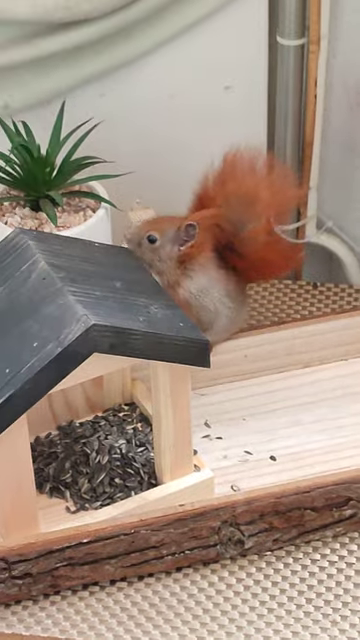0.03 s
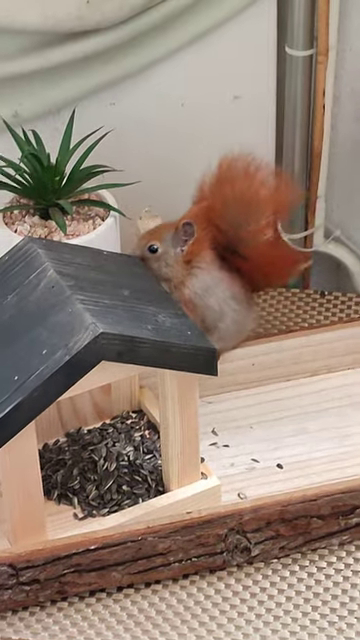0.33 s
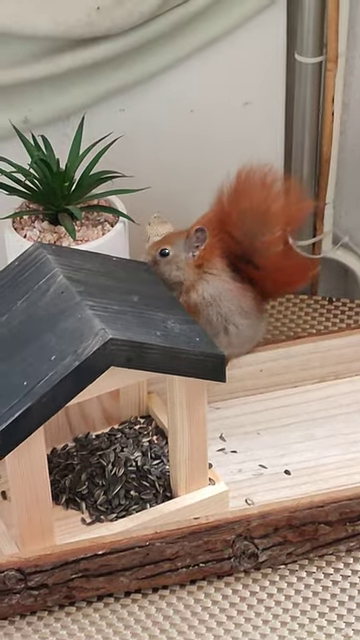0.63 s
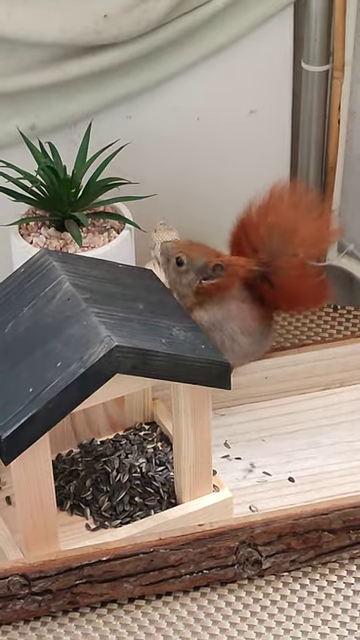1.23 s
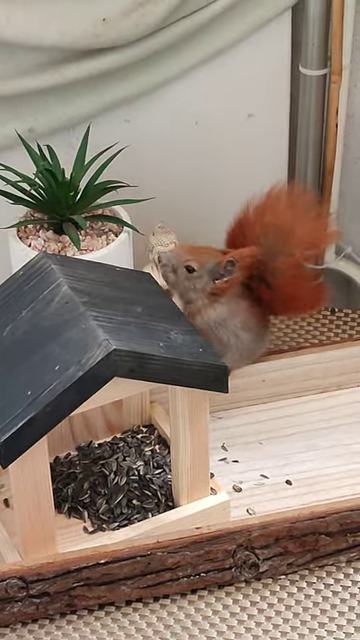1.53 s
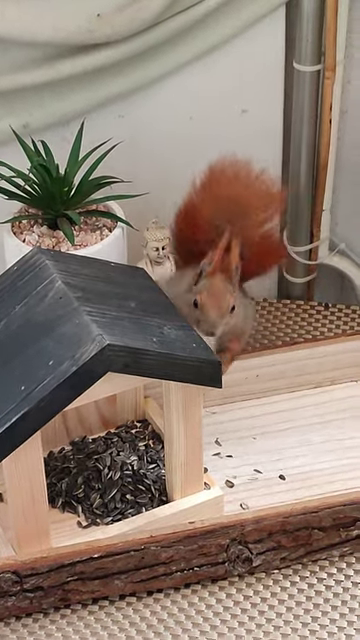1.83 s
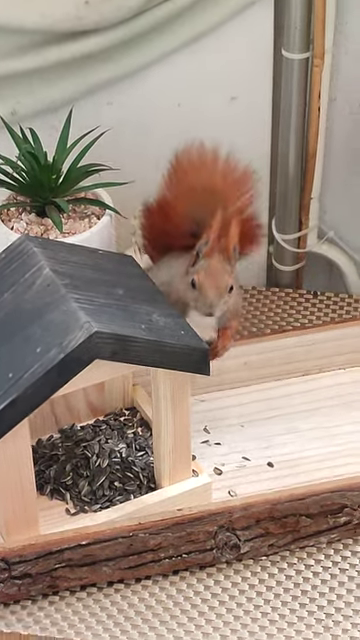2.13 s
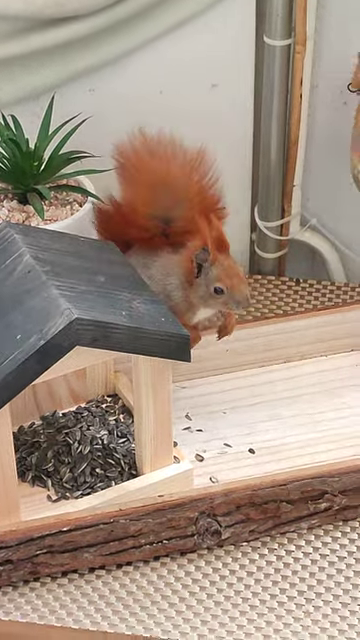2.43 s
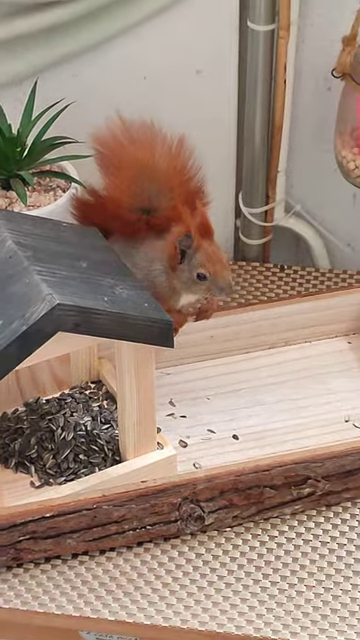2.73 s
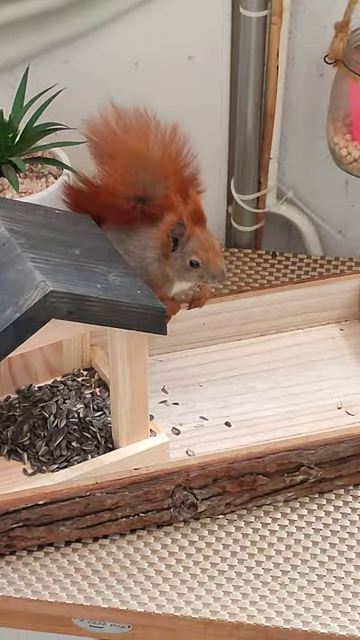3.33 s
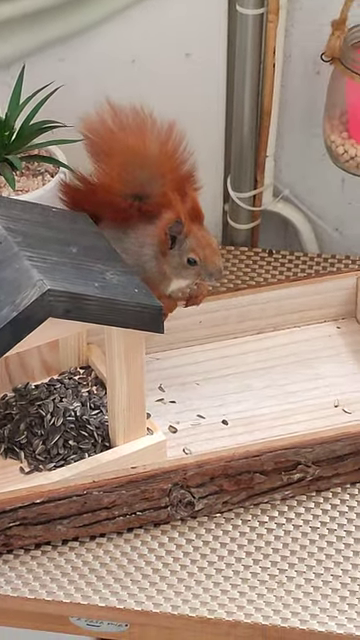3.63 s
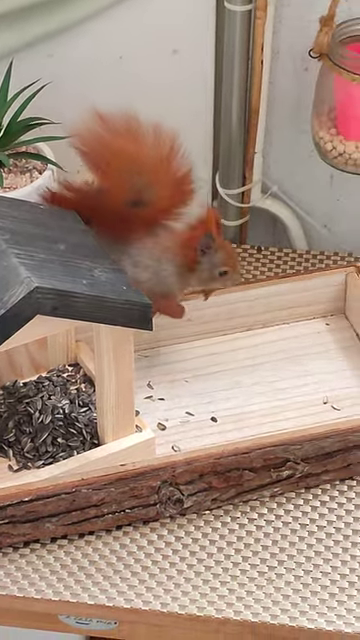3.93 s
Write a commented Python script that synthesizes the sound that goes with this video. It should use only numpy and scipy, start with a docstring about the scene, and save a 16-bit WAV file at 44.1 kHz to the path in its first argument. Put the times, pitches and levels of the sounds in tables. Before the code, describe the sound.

Sharp little clicks of a squirrel cracking seeds, with gusts rumbling on the microphone.

```python
"""Squirrel at a balcony feeder

A squirrel shuffles on a wooden feeder and cracks seed shells: tiny fractures ring each husk,
and the balcony walls throw the snap back. Light gusts buffet the microphones, mostly the left.
Far off, a bird whistles and something wooden knocks over a quiet outdoor hush."""
import sys
import numpy as np
from scipy import signal
from scipy.fft import rfft, irfft
from scipy.io import wavfile
from scipy.ndimage import uniform_filter1d

SR = 44100
rng = np.random.default_rng(int(sys.argv[2]) if len(sys.argv) > 2 else 0)


def transcribe(u):
    """Save the signal u as a 16-bit wav file named by the first command-line argument.

    u: samples, shape (n,) or (channels, n), limited to [-1, 1]; the rate is SR.
    q: integer samples, one column per channel.
    """
    v = np.clip(np.atleast_2d(u).T, -1, 1)
    q = np.round(v * 32767).astype(np.int16)
    wavfile.write(sys.argv[1], SR, q)


N = 176400


def amp(db):
    return 10 ** (np.asarray(db) / 20)


def unit_rms(x):
    return x / np.sqrt(np.mean(x ** 2) + 1e-30)


def curve_at(points, hz):
    """Reads a curve on a log-frequency axis."""
    f, value = np.transpose(points)
    return np.interp(np.log(hz + 1), np.log(f), value)


def add(mix, start_s, sound):
    part = mix[..., max(round(start_s * SR), 0):][..., :sound.shape[-1]]
    part += sound[..., :part.shape[-1]]


def freqs(size):
    return np.fft.rfftfreq(size, 1 / SR) + 1


def pan(left_over_right_db):
    return amp(np.array([[left_over_right_db], [-left_over_right_db]]) / 2)


def click_from(spectrum_db):
    """The tightest causal click with this spectrum."""
    log_gain = np.log(amp(np.r_[spectrum_db, spectrum_db[-2:0:-1]]))
    return np.fft.ifft(np.exp(signal.hilbert(log_gain).conj())).real[:len(spectrum_db)]


def reverb_tail(t60_s, size=16384, damping_hz=9000, treble_t60_share=0.86):
    """A diffuse stereo decay of unit energy a side; the top end dies sooner."""
    t = np.arange(size) / SR
    noise = rfft(rng.standard_normal((2, size)))
    treble = 1 / (1 + (damping_hz / freqs(size)) ** 6)
    decay_db = -60 * t / t60_s
    tail = irfft(noise * (1 - treble)) * amp(decay_db)
    tail += irfft(noise * treble) * amp(decay_db / treble_t60_share)
    tail *= np.minimum(t / 0.0012, 1)
    return tail / np.linalg.norm(tail, axis=1, keepdims=True)


# Tone of the outdoor bed: freq_hz, gain_db
HUSH_COLOUR = [(25, 0.27), (60, -6), (120, -12), (250, -21), (400, -23), (630, -25), (1200, -29),
               (1700, -34), (2500, -39.5), (4000, -43), (7000, -46), (9700, -53), (12500, -50),
               (14000, -51)]
# How alike its two sides are: freq_hz, coherence (0-1)
HUSH_COHERENCE = [(40, 0.2), (130, 0.51), (290, 0.29), (640, 0.45), (1400, 0), (3000, 0), (14000, 0.19)]

def hush(level_db=-55, flicker_db=1.5, top_hz=14280, left_lead_s=0.000274):
    """Steady distant air, partly shared between the sides in the lows, wide in the highs."""
    frames, f = N // 256 + 5, freqs(1024)
    a, b, c, d, flicker = rng.standard_normal((5, frames, len(f)))
    flicker = unit_rms(uniform_filter1d(uniform_filter1d(flicker, 14, axis=0), 12, axis=1))
    coherence = curve_at(HUSH_COHERENCE, f)
    left = a + 1j * b
    right = coherence * left + np.sqrt(1 - coherence ** 2) * (c + 1j * d)
    right *= np.exp(-2j * np.pi * f * left_lead_s)
    colour = amp(curve_at(HUSH_COLOUR, f) + flicker_db * flicker) * (f < top_hz)
    spectra = np.array([left, right]) * colour
    _, air = signal.istft(spectra.transpose(0, 2, 1), nperseg=1024, noverlap=768)
    return amp(level_db) * pan(-0.5) * unit_rms(air[:, :N])


def gust(length_s, level_db, corner_hz, rise_s=0.0078, fall_s=0.0094, low_cut_hz=22.2, size=32768):
    """Turbulence at a microphone: a lumpy rumble that rolls off steeply above its corner."""
    t, f = np.arange(size) / SR, freqs(size)
    colour = f ** -0.59 / np.hypot(1, (low_cut_hz / f) ** 2) / np.hypot(1, (f / corner_hz) ** 3.89)
    attack = np.sin(np.pi / 2 * np.minimum(t / rise_s, 1)) ** 2
    release = 1 / (1 + np.exp(np.minimum((t - length_s) / fall_s, 50)))
    lumps_db = 3 * unit_rms(irfft(rfft(rng.standard_normal(size)) * np.exp(-(f * 0.014) ** 2)))
    rumble = irfft(colour * np.exp(2j * np.pi * rng.random(len(f))))
    rumble *= attack * release * amp(lumps_db)
    return amp(level_db) * rumble * np.sqrt(length_s * SR) / np.linalg.norm(rumble)


# Buffets on each microphone: start_s, length_s, level_db, corner_hz
LEFT_GUSTS = [(.03, 0.098, -37, 119), (.113, 0.067, -26, 209), (0.191, 0.071, -28.5, 132),
              (.27, 0.13, -42, 67.5), (0.381, 0.036, -30.5, 205), (0.428, 0.028, -25.5, 236),
              (.475, 0.06, -34.5, 109), (0.561, 0.67, -44, 55.6), (0.977, 0.039, -24, 152),
              (1.019, 0.19, -34, 162), (1.15, 0.041, -23.5, 248), (1.189, 0.038, -23, 223),
              (1.225, 0.038, -32.5, 214), (1.273, 0.13, -44, 101), (1.68, 0.033, -32, 235),
              (1.721, 0.039, -36, 222), (1.8, 0.14, -42, 194), (1.952, 0.034, -33.5, 214),
              (1.985, 0.091, -43.5, 124), (2.15, 0.044, -41.5, 64), (2.782, 0.25, -50.5, 94),
              (3.044, 0.081, -37.5, 124), (3.095, 0.085, -37, 180), (3.192, 0.096, -38, 180),
              (3.281, .16, -43.5, 108), (3.529, 0.084, -31.5, 141), (3.66, 0.17, -45, 78)]
RIGHT_GUSTS = [(0, 0.043, -44.5, 60), (0.701, 0.13, -45.5, 57), (3.332, 0.2, -54, 70),
               (3.659, .14, -49, 69)]

def wind():
    """Gusts hit the exposed left microphone; a few weaker ones reach the right."""
    out = np.zeros((2, N))
    for side, gusts in zip(out, (LEFT_GUSTS, RIGHT_GUSTS)):
        for start_s, *settings in gusts:
            add(side, start_s, gust(*settings))
    return out


def rustle(length_s, level_db, centre_hz, width_octaves=0.77, grains_per_s=2200, grit_db=4):
    """A soft stroke of fine scratches, a few larger than the rest."""
    size = int(length_s * SR)
    grains = rng.standard_normal(size) * amp(grit_db * np.minimum(rng.exponential(1, size), 3))
    grains *= rng.random(size) < grains_per_s / SR
    band = np.exp(-(np.log2(freqs(size) / centre_hz) / width_octaves) ** 2)
    return amp(level_db) * unit_rms(irfft(rfft(grains) * band, size) * np.hanning(size) ** 0.5)


# Brushes against the feeder: start_s, length_s, level_db, centre_hz
PAW_STROKES = [(0.126, 0.067, -76.5, 4630), (0.189, 0.092, -82, 4600), (0.275, 0.082, -79.5, 4640),
               (.44, 0.076, -80.5, 5430), (0.444, 0.068, -76.5, 2780), (0.665, 0.035, -87, 3170)]

def paws_and_fur():
    """Paws and fur brush the wood as the squirrel noses about."""
    out = np.zeros(N)
    for start_s, *settings in PAW_STROKES:
        add(out, start_s, rustle(*settings))
    add(out, 0, rustle(length_s=1.39, level_db=-94, centre_hz=4500))  # fur shifting underneath
    return out


# Wind pops: centre_s, level_db, half_width_s
EDDIES = [(0.1184, -16, 0.0015), (.146, -16.5, 0.0014), (0.4436, -19.5, 0.0014), (.953, -12.5, 0.0017),
          (0.9853, -15.5, 0.001), (1.0035, -9, 0.001), (1.009, -9.5, 0.00083), (1.089, -16, 0.0025),
          (1.159, -19.5, 0.0013), (1.195, -15.5, 0.0011), (1.692, -24, 0.0017), (1.745, -25.5, 0.0011),
          (1.814, -20, 0.0022), (1.844, -18.5, 0.003), (1.895, -20, 0.0016), (3.395, -27, 0.0025),
          (3.551, -20, 0.0027), (3.615, -22, 0.0026), (3.721, -25, 0.0028), (3.742, -32.5, 0.0018)]

def eddy_pops(spread=1.23):
    """Single eddies hit the left microphone: a sharp push inside a wider, weaker suction."""
    out, t = np.zeros((2, N)), np.arange(-SR // 20, SR // 20) / SR
    for centre_s, level_db, half_width_s in EDDIES:
        push = 1 / np.cosh(t / half_width_s * np.pi / 2)
        suction = 1 / np.cosh(t / half_width_s / spread) / spread / 2
        add(out[0], centre_s + t[0], amp(level_db) * (push - suction))
    return out


# Tone of a seed snap as heard through the microphone: freq_hz, gain_db
SNAP_COLOUR = [(200, -12), (700, -3), (1300, -5), (2000, 0), (2800, 2.5), (3900, 2), (4900, -2.5),
               (6000, 0), (7200, 1.5), (8500, -8), (9700, -18.5), (11200, -14.5), (12400, -10),
               (14000, -23), (16000, -37)]
# Snaps and tooth ticks: start_s, energy_db, decay_s, tilt_db_per_octave, ring_hz, ring_db
SHELL_SNAPS = [(0.157, -46.5, 0.0012, 7, 5200, 4), (.238, -45, .003, -9, 5240, -4),
               (0.369, -42.5, 0.0089, 4, 4730, 7), (0.85, -47, 0.0021, 5, 4200, 11),
               (0.993, -22, 0.00091, -2, 3740, 9), (1.131, -41.5, 0.0034, -5.5, 2363, 2),
               (1.181, -52, .002, 4, 4950, 20), (1.2569, -22, 0.0017, 3, 6660, -3),
               (1.3485, -27.5, 0.0011, 0, 6100, 6), (1.4055, -38, 0.0088, -2, 6170, 4),
               (1.535, -50, 0.011, 3, 7100, -1), (1.819, -48, 0.0036, -1.5, 6000, 4),
               (2.245, -55, .002, 4, 6740, -3), (2.324, -52, .003, -3, 5000, 2),
               (2.623, -53.5, 0.0056, 5, 5900, 8), (2.7536, -44, 0.00072, -5, 2470, 9)]

def shell_snaps(rise_s=0.00057, fracture_share=0.35, ring_width_hz=230, size=2048):
    """Each snap is a quick run of tiny fractures ringing the husk."""
    out, t, f = np.zeros(N), np.arange(size) / SR, freqs(size)
    for start_s, energy_db, decay_s, tilt_db_per_octave, ring_hz, ring_db in SHELL_SNAPS:
        fractures = rng.standard_normal(size) * (rng.random(size) < fracture_share)
        spectrum = rfft(fractures * np.minimum(t / rise_s, 1) * np.exp(-t / decay_s))
        crackle = irfft(spectrum / np.sqrt(abs(spectrum) + 1e-9))[:size // 2]  # evens out the colour
        tilt_db = tilt_db_per_octave * np.log2(np.maximum(f, 1000) / 4000)
        resonance_db = ring_db / (1 + ((f - ring_hz) / ring_width_hz) ** 2)
        click = click_from(curve_at(SNAP_COLOUR, f) + tilt_db + resonance_db)
        snap = signal.fftconvolve(crackle, click)
        add(out, start_s, amp(energy_db) * snap / np.linalg.norm(snap))
    return out


# Slap off nearby walls and boards: delay_s, left_gain, right_gain
WALL_ECHOES = [(.0021, .3, 0.72), (.0036, .2, .35), (.0069, .25, .35), (.0094, 0.17, 0.23),
               (0.0105, .25, .3)]

def balcony(sound):
    """Direct sound, early reflections, a tight room and a faint longer tail."""
    response = amp(3) * reverb_tail(t60_s=0.13) + amp(-16) * reverb_tail(t60_s=0.36)
    response[:, 0] += 1
    for delay_s, left_gain, right_gain in WALL_ECHOES:
        add(response[0], delay_s * rng.uniform(1.0, 1.1), np.array([left_gain]))
        add(response[1], delay_s, np.array([right_gain]))
    return signal.fftconvolve(sound[None], response, axes=1)[:, :N]


# Distant calls: start_s, length_s, level_db, from_hz, to_hz
BIRD_WHISTLES = [(0.494, 0.071, -79, 3050, 2970), (0.661, 0.03, -77, 2970, 2600),
                 (.73, 0.16, -82.5, 5200, 3550), (2.943, .23, -82.5, 4900, 3630),
                 (3.52, 0.041, -79, 3350, 3380)]

def bird(slide_power=2.3, warble_depth=0.033):
    """Thin whistles, most sliding down and levelling off, heard only as reverb."""
    out = np.zeros(N)
    for start_s, length_s, level_db, from_hz, to_hz in BIRD_WHISTLES:
        progress = np.linspace(0, 1, int(length_s * SR))
        warble = unit_rms(uniform_filter1d(rng.standard_normal(len(progress)), size=90))
        slide_hz = to_hz + (from_hz - to_hz) * (1 - progress) ** slide_power
        phase = 2 * np.pi * np.cumsum(slide_hz * (1 + warble_depth * warble)) / SR
        add(out, start_s, amp(level_db) * unit_rms(np.sin(np.pi * progress) * np.sin(phase)))
    return signal.fftconvolve(out[None], reverb_tail(t60_s=0.22), axes=1)[:, :N]


# Modes of the knocked wood: pitch_hz, gain_db, t60_s
WOOD_MODES = [(432, 6, 0.17), (688, -2, 0.1), (810, 0, 0.12), (1170, 4, 0.083), (1370, -1, 0.15),
              (1643, -0.5, 0.14), (2370, -27, 0.083), (3260, -16, 0.13)]
# Distant hits: start_s, level_db, focus_hz
FAR_KNOCKS = [(1.679, -68.5, 1710), (2.145, -66, 800), (2.325, -79.5, 1710), (2.809, -76, 1170)]

def knocks(rise_s=0.0081, boost_db=8, smear_gain=0.42, smear_width_hz=90, size=8192):
    """Far wooden knocks: each mode rings in a smear of reflections, boosted near the hit's focus."""
    out, t, f = np.zeros((2, N)), np.arange(size) / SR, freqs(size)
    for start_s, level_db, focus_hz in FAR_KNOCKS:
        noise = rfft(rng.standard_normal((2, size)))
        body = np.zeros((2, size))
        for pitch_hz, gain_db, t60_s in WOOD_MODES:
            focus_db = boost_db * np.exp(-((pitch_hz - focus_hz) / 200) ** 2)
            ring = np.sin(2 * np.pi * (pitch_hz * t + rng.random() + rng.uniform(0, 0.33, (2, 1))))
            smear = unit_rms(irfft(noise / (1 + 1j * (f - pitch_hz) / smear_width_hz)))
            body += (ring + smear_gain * smear) * amp(gain_db + focus_db - 60 * t / t60_s)
        add(out, start_s, amp(level_db) * unit_rms(body * np.minimum(t / rise_s, 1)))
    return out


def scene():
    """The squirrel close up and a little to the right, with the outdoors around it."""
    squirrel = balcony(shell_snaps() + paws_and_fur()) * pan(-3.5)
    return squirrel + knocks() + bird() + wind() + eddy_pops() + hush()


def record(dry):
    """The recorder's band limit: a steep low-pass."""
    low_pass = signal.firwin(511, cutoff=15450, window=("kaiser", 9), fs=SR)
    return signal.oaconvolve(dry, low_pass[None], "same")


dry = scene()
out = record(dry)
transcribe(out)
```